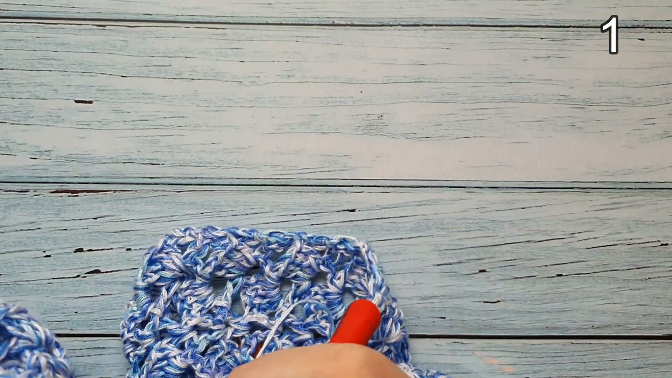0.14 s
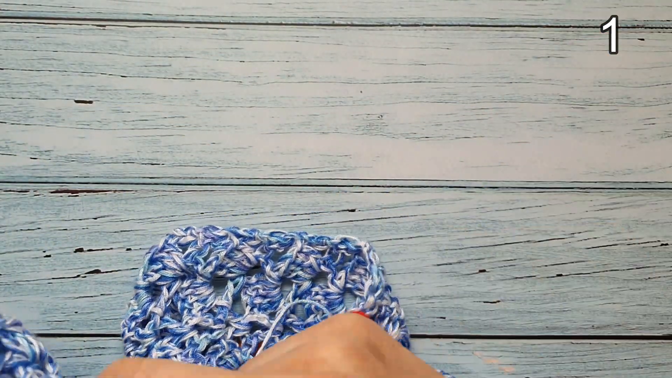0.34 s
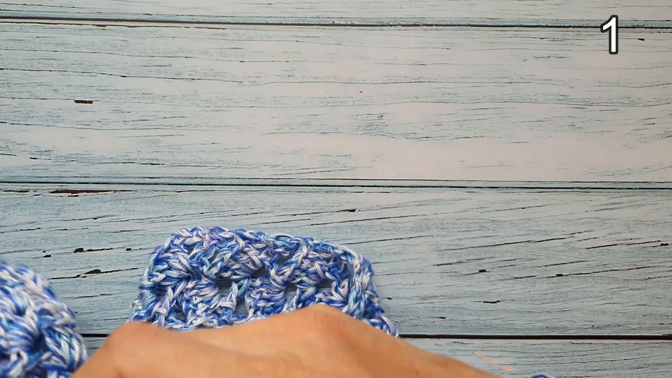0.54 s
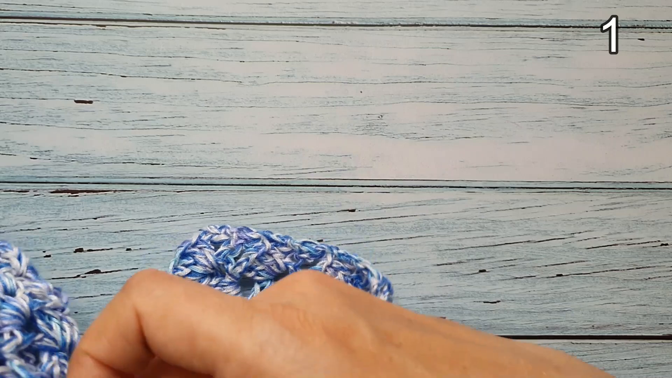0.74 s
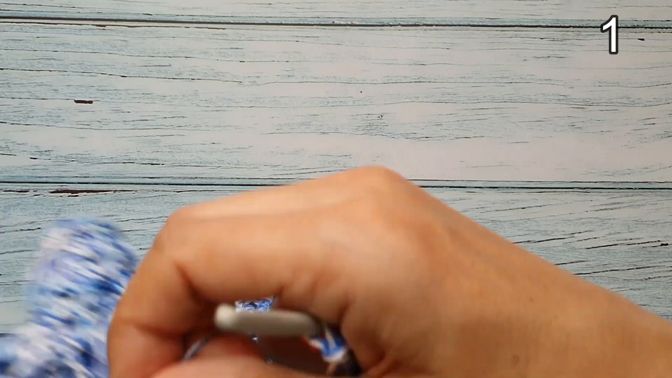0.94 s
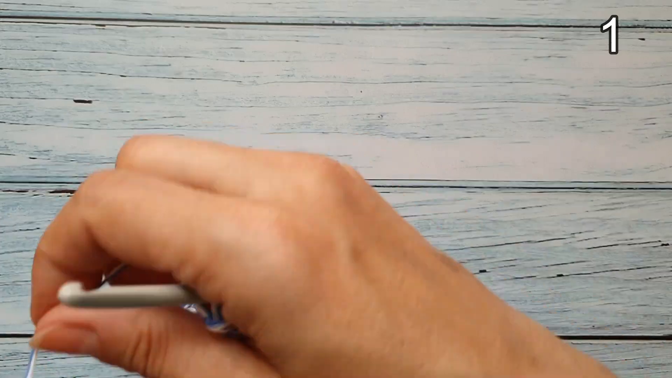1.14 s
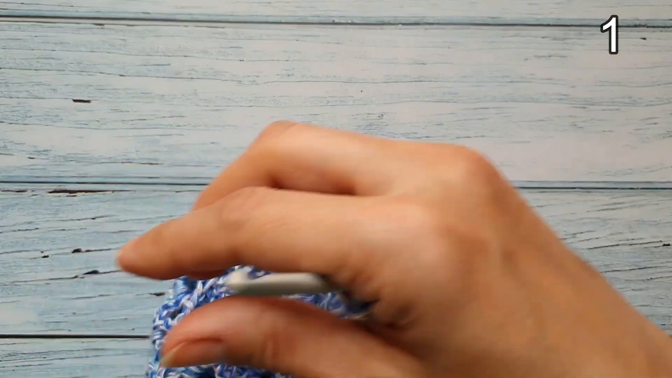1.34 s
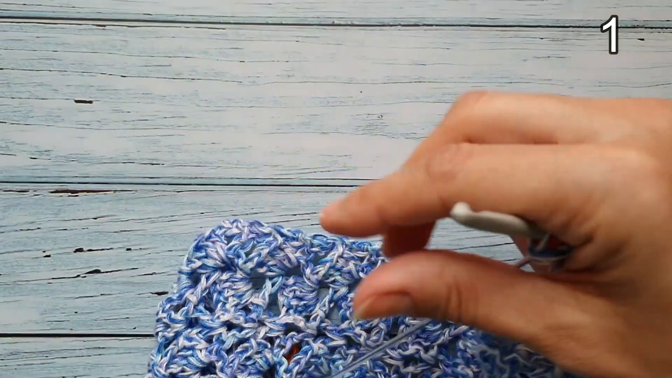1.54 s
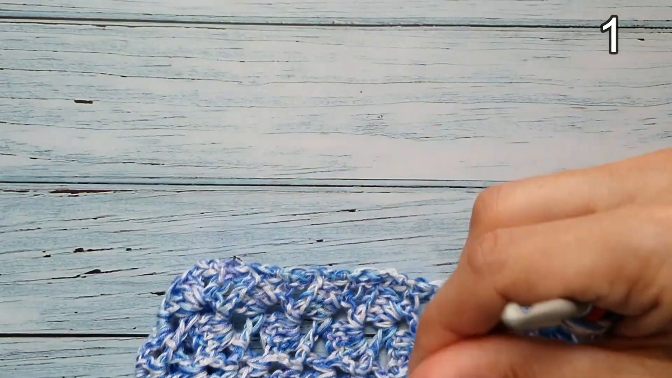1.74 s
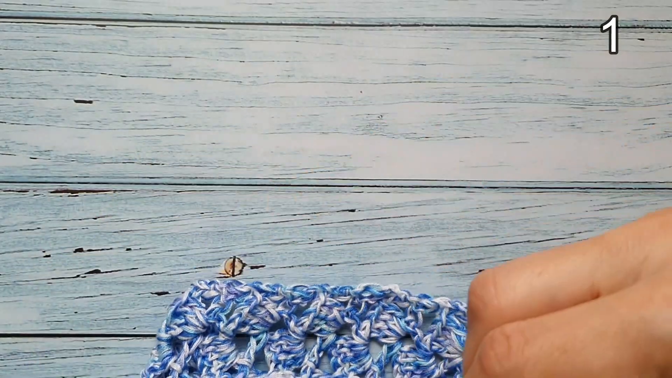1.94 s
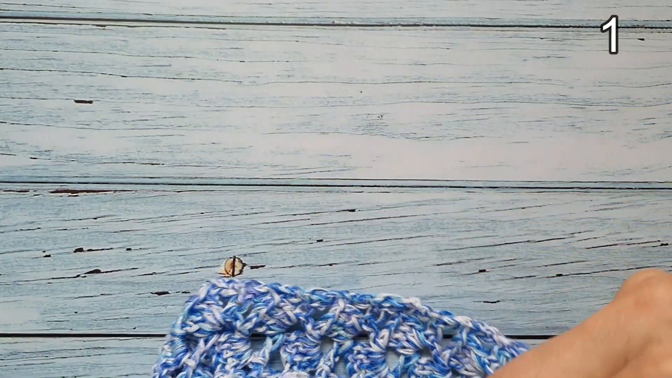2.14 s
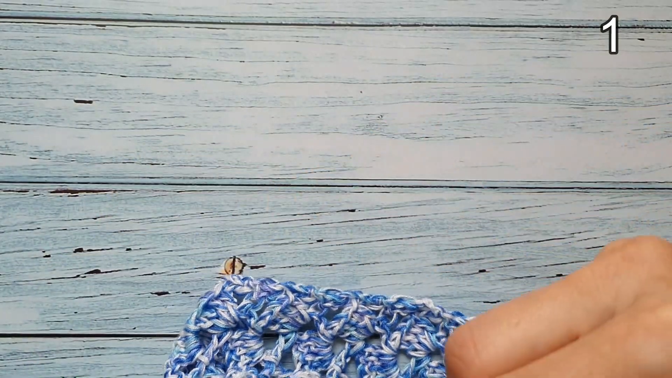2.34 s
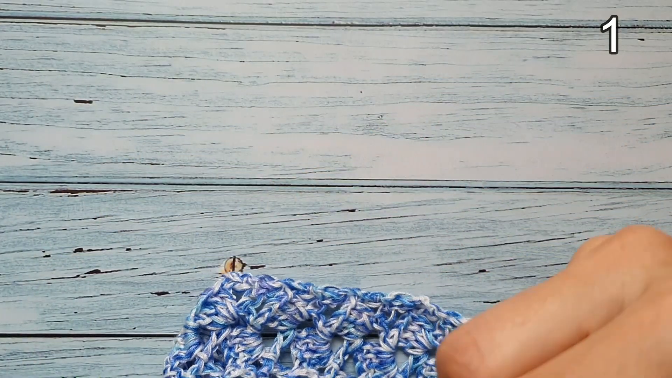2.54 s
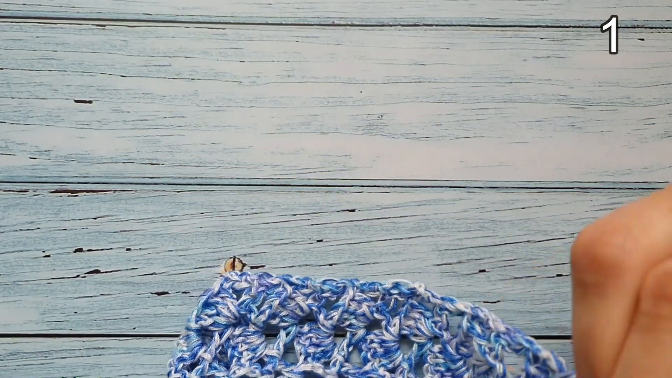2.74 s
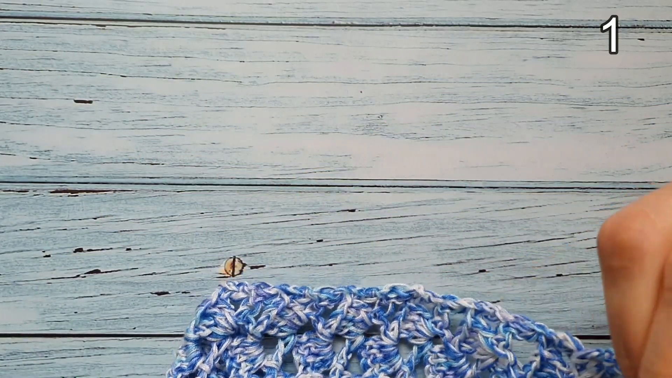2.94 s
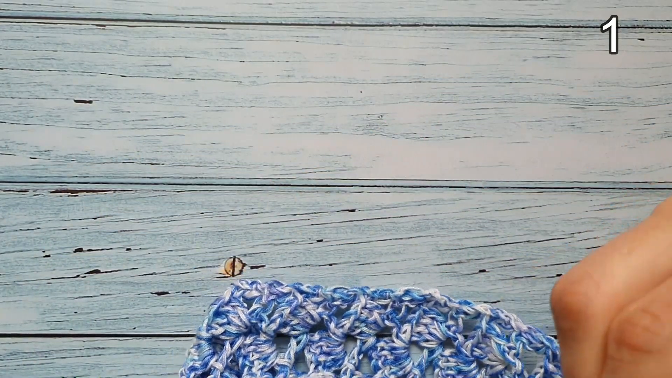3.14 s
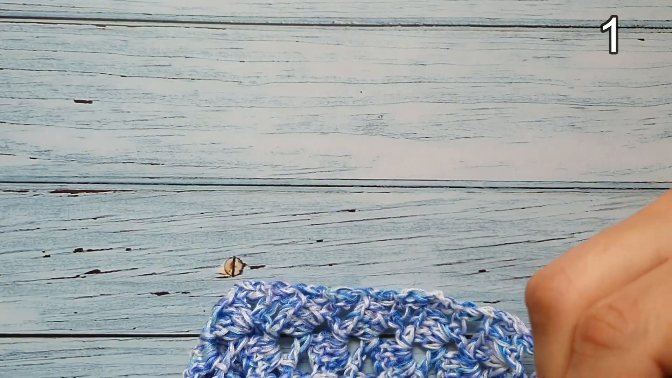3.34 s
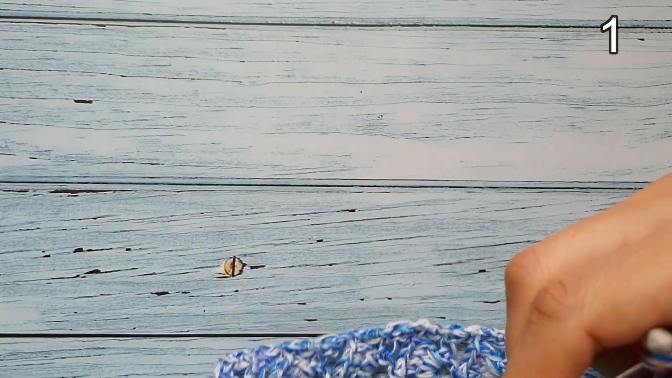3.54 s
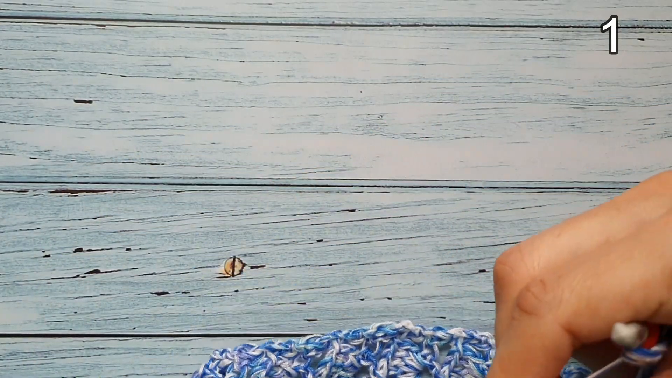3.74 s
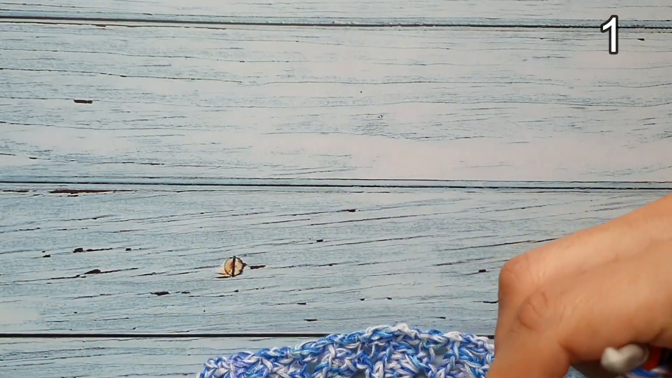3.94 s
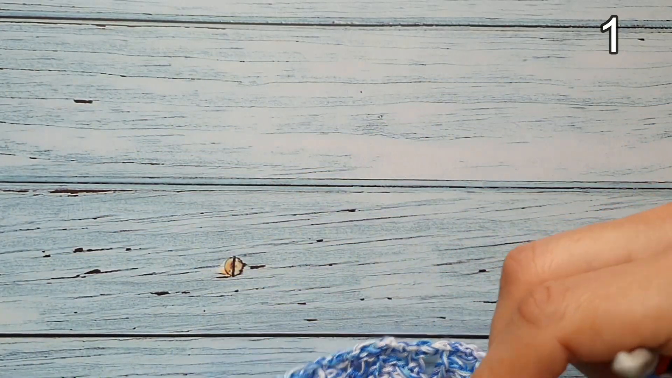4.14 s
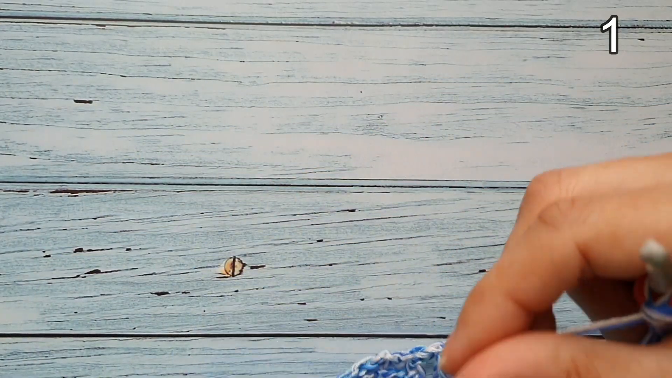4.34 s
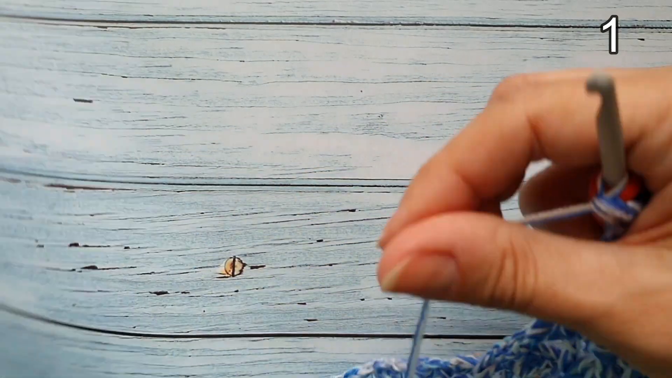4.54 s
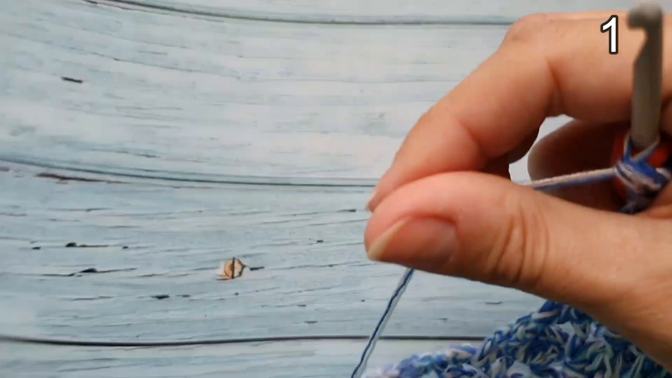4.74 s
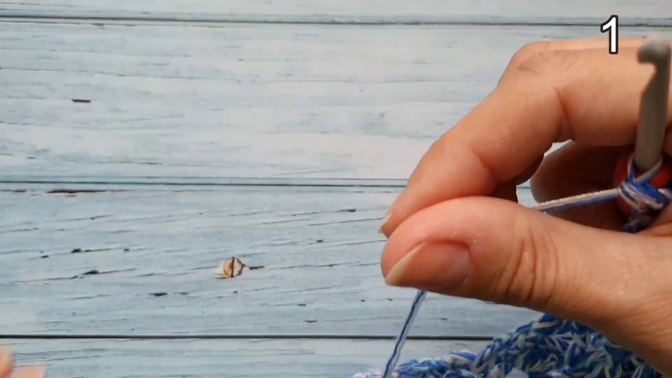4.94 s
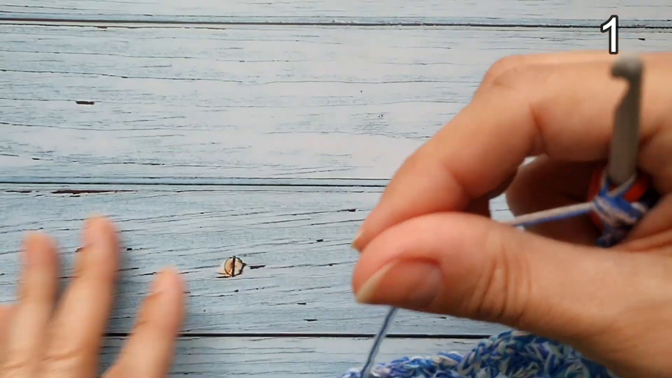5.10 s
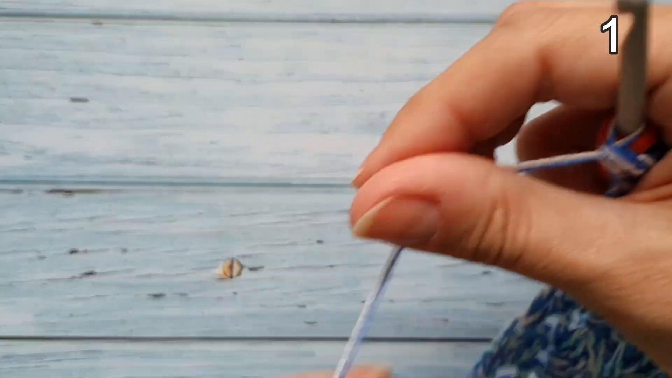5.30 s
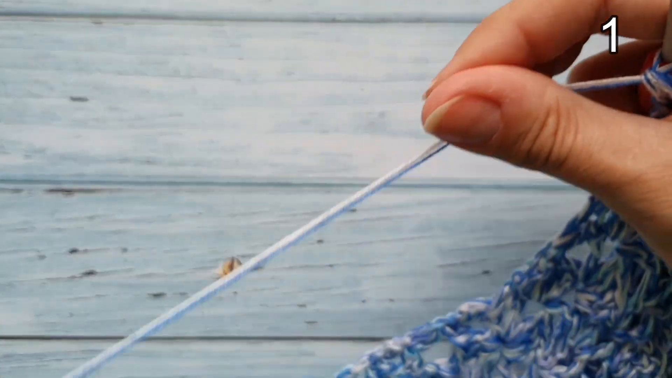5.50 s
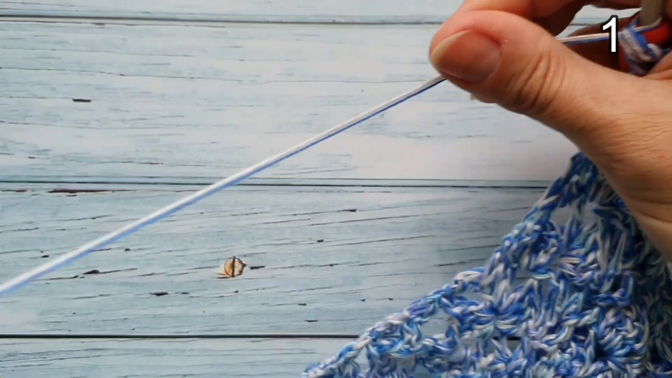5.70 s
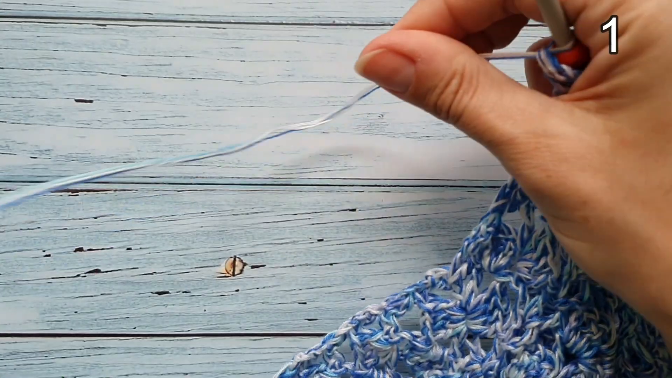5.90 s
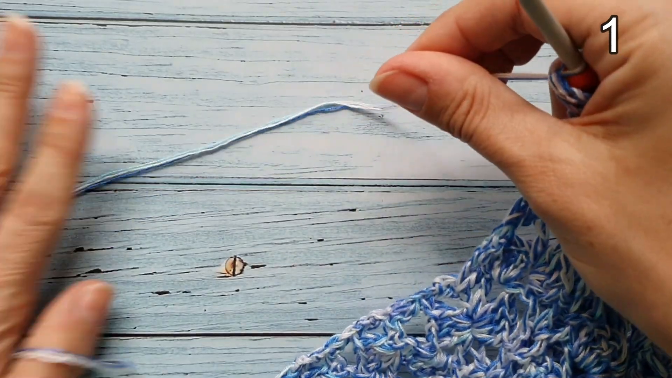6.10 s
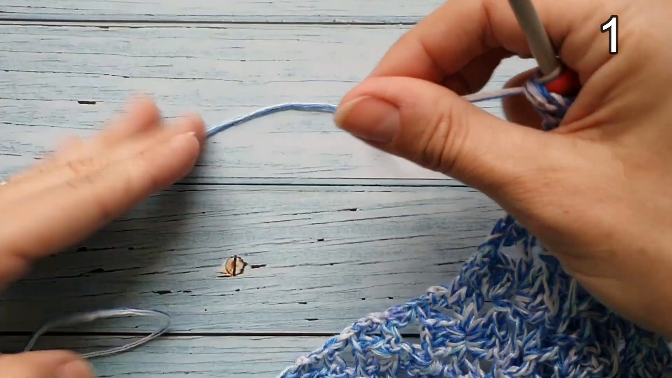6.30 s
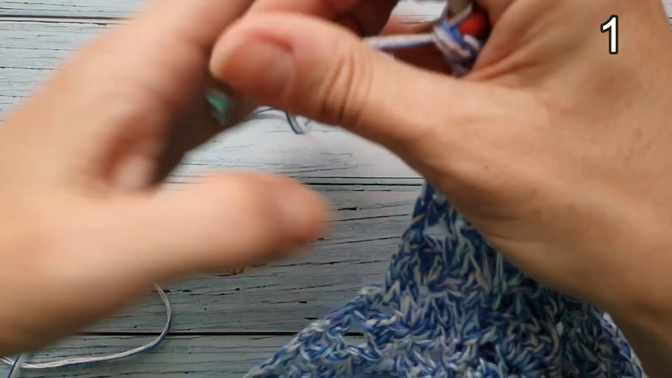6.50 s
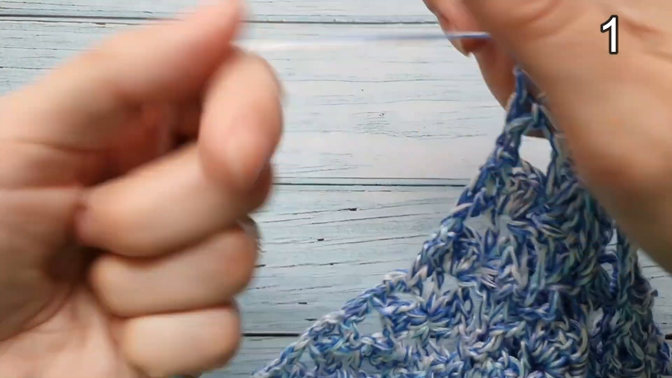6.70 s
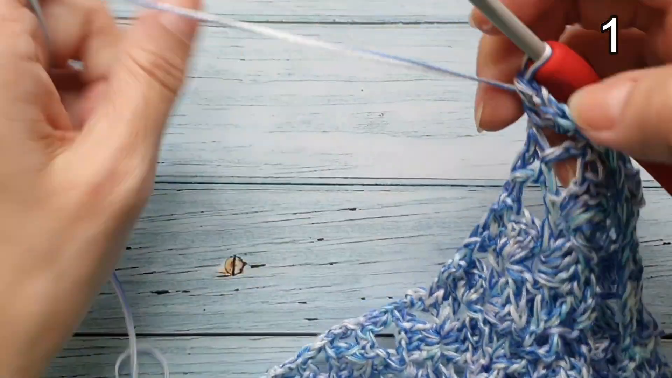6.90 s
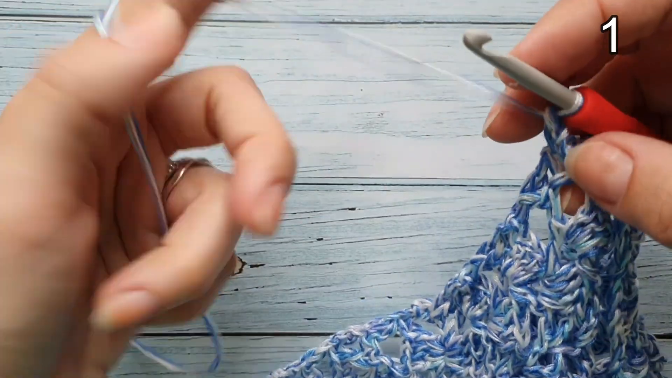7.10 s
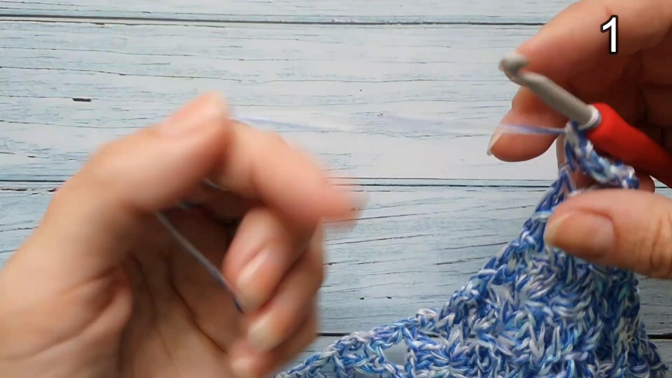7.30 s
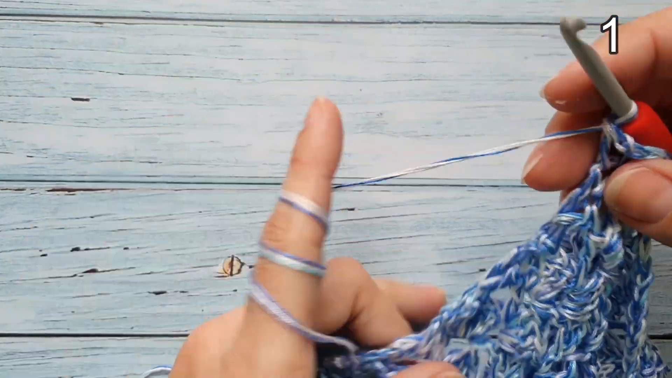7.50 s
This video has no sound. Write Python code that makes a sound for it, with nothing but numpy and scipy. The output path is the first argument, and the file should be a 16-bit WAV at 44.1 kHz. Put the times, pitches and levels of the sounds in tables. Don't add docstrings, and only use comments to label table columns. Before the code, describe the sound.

Close, nearly mono phone pickup of crochet handling on a tabletop. Wool scrapes and fibres hiss in short bursts, palms give dull low thuds, and nails and a hook tick drily. Activity thickens into a hollow wooden clatter, calms to faint rustling, then a single ring-like rap cracks far louder than everything else, with a short rattle and low hum before quiet.

```python
import sys
import numpy as np
from scipy import signal
from scipy.fft import rfft, irfft
from scipy.io import wavfile
from scipy.ndimage import uniform_filter1d

SR = 44100
rng = np.random.default_rng(int(sys.argv[2]) if len(sys.argv) > 2 else 0)


def waveform_to_disk(signal):
    frames = np.transpose(np.atleast_2d(signal))
    scaled = np.clip(frames, -1, 1) * 32767
    samples = np.round(scaled).astype(np.int16)
    wavfile.write(sys.argv[1], SR, samples)


def linear_from_db(decibels):
    return 10 ** (np.asarray(decibels, float) / 20)


N = 337629


def level(x, db):
    return x * linear_from_db(db) / np.sqrt(np.mean(x ** 2))


def band(x, hz, width):
    return signal.lfilter(*signal.iirpeak(min(hz, .4 * SR), hz / width, fs=SR), x)


def walk(rate):
    hold = int(SR / rate)
    steps = np.repeat(rng.standard_normal(N // hold + 1), hold)
    return 2.0 * uniform_filter1d(uniform_filter1d(steps, hold), hold)[:N]


def coloured(points):
    hz, db = np.transpose(points)
    log_hz = np.log(np.fft.rfftfreq(N, 1 / SR) + 1)
    gain = linear_from_db(np.interp(log_hz, np.log(hz), db, left=-60))
    return irfft(rfft(rng.standard_normal(N)) * gain, N)


def add(out, s, x):
    i = int(s * SR)
    out[i:i + len(x)] += x[:N - i]


def fade(t60, seconds):
    return np.exp(-np.log(1000) * np.arange(int(seconds * SR)) / SR / max(t60, .003))


def mode(hz, t60, seconds):
    return np.sin(2 * np.pi * hz * np.arange(int(seconds * SR)) / SR) * fade(t60, seconds)


def slips(scatter_db, size):
    strength_db = scatter_db * np.minimum(rng.exponential(size=size), 7)
    return rng.standard_normal(size) * linear_from_db(strength_db)


# pitch_hz, density_db (per Hz)
ROOM_SPECTRUM = [(15, -36.5), (25, 1), (55, 3.5), (99, 2), (293, -11), (384, -16.5), (775, -20.5),
                 (988, -32.5), (1290, -28.5), (1740, -25.5), (1940, -27.5), (3430, -42.5), (6380, -27.5),
                 (14400, -29), (16000, -41)]
ROOM_DB = -66


def room_air():
    hollow = level(band(rng.standard_normal(N), 820, 130), -84)
    return (level(coloured(ROOM_SPECTRUM), ROOM_DB) + hollow) * linear_from_db(0.79 * walk(9))


# start_s, length_s, level_db
SWAYS = [
    (6.68, 0.12, -65.5),
    (6.764, 0.204, -47.5),
    (6.957, 0.219, -47),
    (7.148, .15, -52.5),
    (7.3, 0.104, -54),
    (7.407, 0.22, -59),
]


def sway():
    size = np.zeros(N)
    for s, seconds, db in SWAYS:
        add(size, s, linear_from_db(db) * np.hanning(int(seconds * SR)) ** 0.73)
    return np.sqrt(2) * size * np.sin(2 * np.pi * 66 * np.arange(N) / SR)


def thump_train(rows, t60):
    out = np.zeros(N)
    for s, db, hz in rows:
        swell = (1 - fade(3.9 / hz, .6)) ** 2
        ring = mode(hz, t60, .6) + linear_from_db(-11.5) * mode(2.3 * hz, 0.73 * t60, .6)
        add(out, s, linear_from_db(db + 9.5) * swell * ring)
    return out


# start_s, level_db, pitch_hz
THUMPS = [(0.927, -47.5, 67.1), (1.254, -58, 68.7), (1.389, -28.5, 73.8), (1.439, -29, 73.9),
          (1.62, -35, 57.6), (1.826, -72, 87.5), (2.338, -53, 79), (2.455, -53, 67.5), (2.957, -50.5, 66),
          (3.191, -41.5, 100), (3.479, -54, 56), (3.994, -35, 74.5), (4.089, -52.5, 60.6),
          (4.165, -50.5, 62.5), (4.417, -40, 76.5), (4.602, -47, 106.3), (4.984, -43.5, 114.4),
          (5.028, -31.5, 70), (5.089, -40.5, 62.2), (5.282, -24.5, 98.3), (5.428, -42.5, 76.2),
          (6.059, -50, 56.5), (6.571, -37.5, 57.9), (6.649, -49.5, 59.6), (7.63, -48.5, 106.3)]
# start_s, level_db, pitch_hz
PRESSES = [
    (2.138, -42, 74.4),
    (3.798, -39, 83.5),
    (4.373, -35.5, 98.3),
    (4.449, -34.5, 66),
    (4.806, -32.5, 75),
    (5.479, -34.5, 57.7),
    (6.183, -41, 76),
    (6.385, -23.5, 80),
    (6.448, -28, 115),
]


def palms():
    return thump_train(THUMPS, t60=0.11) + thump_train(PRESSES, t60=0.1)


# start_s, level_db, tilt_db (per octave)
BUMPS = [
    (5.0295, -27, 5),
    (5.0325, -21, 1),
    (5.0405, -27, -2),
    (5.0478, -23, 0),
    (5.0545, -27, 3),
    (5.0625, -35, 0),
    (5.0705, -32, -1),
    (5.077, -35, -2),
]
# pitch_hz, level_db, t60_s
HOLLOW_MODES = [(436, 2, .08), (560, -2, .05), (684, 1, .07), (829, -2, .05), (1210, -7, .03),
                (1320, -8, .03), (1660, -10, .03), (1950, -15, .02)]


def bumps():
    out = np.zeros(N)
    chance = rng.standard_normal((len(BUMPS), len(HOLLOW_MODES)))
    for (s, db, tilt_db), sides in zip(BUMPS, chance):
        ring = 0
        for side, (hz, mode_db, t60) in zip(sides, HOLLOW_MODES):
            gain = linear_from_db(mode_db + tilt_db * np.log2(hz / 600))
            ring = ring + np.sign(side) * gain * mode(hz, t60, .15)
        ring = ring * (1 - fade(.002, .15))
        add(out, s, linear_from_db(db) * ring / abs(ring).max())
    return out


RAP_S, RAP_DB = 6.3968, -3.3
# pitch_hz, level_db, t60_s
QUICK_MODES = [(233.3, 1, 0.35), (580, 2.5, 0.2), (947, -9, 0.19), (1287, -10, 0.23), (1660, 10, 0.061),
               (1711, -9, 0.15), (2080.5, -3, 0.3), (2350, -13, 0.2), (2632, -12, 0.27), (2844, -9.5, 0.3),
               (2966, -10.5, 0.3), (3450, -1.5, 0.1), (4059, -16, 0.2), (5770, -9, 0.12)]
# pitch_hz, level_db, t60_s
LASTING_MODES = [(219, -37, .7), (598, -39, 1.2), (2540, -51, 1.2), (2640, -51, 1.1), (2940, -45, 0.55),
                 (49.1, -27.5, 0.69)]
# pitch_hz, level_db, t60_s
RATTLE_BANDS = [(444, -18, 0.2), (800, -18, 0.17), (1800, -17, .2), (2900, -15, 0.029), (2700, -26, .2),
                (6000, -33.5, 0.23)]


def rap():
    out = np.zeros(N)
    length_s = 1.2
    quick = 0
    for k, (hz, db, t60) in enumerate(QUICK_MODES):
        quick = quick + (-1) ** k * linear_from_db(db - 15.0) * mode(hz, min(0.44 * t60, .16), length_s)
    snap = linear_from_db(-2) * mode(1500, .009, length_s) + linear_from_db(-3) * mode(2300, .014, length_s)
    snap = snap + linear_from_db(-7) * mode(3200, .022, length_s) + linear_from_db(-16) * mode(6500, .015, length_s)

    noise = rng.standard_normal((len(RATTLE_BANDS) + len(LASTING_MODES), int(length_s * SR)))
    lasting = 0
    for n, (hz, db, t60) in zip(noise[::-1], LASTING_MODES):
        shaken = level(band(n, hz, 8 + .03 * hz), -3) * fade(t60, length_s)
        lasting = lasting + linear_from_db(db) * (mode(hz, t60, length_s) + shaken)
    rattle = 0
    for n, (hz, db, t60) in zip(noise, RATTLE_BANDS):
        rattle = rattle + level(band(band(n, hz, 0.89 * hz), hz, 0.89 * hz), db) * fade(t60, length_s)
    add(out, RAP_S, linear_from_db(RAP_DB) * (quick - snap + lasting + rattle))
    return out


# start_s, level_db, low_hz, high_hz
SPARKS = [(1.388, -46, 5460, 7200), (1.6222, -45, 500, 2400), (1.3875, -42, 600, 2300),
          (5.0785, -44, 6300, 9300), (5.0895, -50, 6000, 9000), (1.623, -55.5, 5000, 6800),
          (1.688, -50, 5300, 7000), (1.569, -54, 6000, 6900), (1.6885, -52, 500, 1200),
          (6.229, -48, 2550, 2950), (6.234, -56, 1650, 1940), (5.5065, -43, 600, 1300),
          (2.134, -52, 1500, 3500), (2.1735, -43, 600, 2400), (4.389, -48, 5000, 7500),
          (4.617, -47, 2500, 4500), (4.6555, -41, 6000, 15000), (4.673, -54, 4000, 11000),
          (4.807, -51.5, 6000, 12500), (4.8204, -37, 2500, 11000), (4.861, -40.5, 2000, 4200),
          (4.9345, -42, 5000, 11000), (5.0475, -40, 2800, 14000), (5.098, -23.5, 1500, 4630),
          (5.1183, -25, 1580, 4560), (5.2825, -36, 4000, 14000), (5.3031, -39, 5500, 10000),
          (6.413, -18, 4800, 8200), (6.414, -24, 2700, 3670), (6.424, -29, 5000, 7000)]


def sparks():
    out = np.zeros(N)
    for (s, db, low_hz, high_hz), a in zip(SPARKS, rng.standard_normal((len(SPARKS), 600))):
        burst = a * fade(.012, 1)[:len(a)]
        bandpass = signal.butter(2, [low_hz, high_hz], "band", fs=SR, output="sos")
        snap = signal.sosfilt(bandpass, burst)
        add(out, s, linear_from_db(db) * snap / abs(snap).max())
    return out


def tick_train(rows, tail_db):
    out = np.zeros(N)
    chance = rng.standard_normal((len(rows), 2, SR // 5))
    for (s, db, hz, tip_db, wood_db), (a, b) in zip(rows, chance):
        burst = mode(hz, 2.5 / hz, .2) + linear_from_db(tail_db - 5.0) * a * fade(0.11, .2)
        middle = band(band(burst, hz, 1.1 * hz), hz, 1.1 * hz)
        tip = band(band(.5 * burst + a * fade(.006, .2), 6500, 2600), 6500, 3200)
        wood_noise = band(band(b * fade(0.02, .2), 420, 830), 610, 1000)
        wood = mode(710, 0.031, .2) + linear_from_db(13.5) * wood_noise
        parts = [(middle, 0), (tip, tip_db + 8.0), (wood, wood_db + 1.5)]
        add(out, s, sum(linear_from_db(db + part_db) * part / abs(part).max() for part, part_db in parts))
    return out


# start_s, level_db, pitch_hz, tip_db, wood_db (the last two re level_db)
KNOCKS = [(1.3871, -38.5, 1740, -6, 1), (1.6217, -43.5, 1440, -18, 1.5), (1.6885, -52, 1000, -20, 5),
          (3.5482, -75.5, 1750, 1, 16), (3.656, -61.5, 1350, -8, 4.5), (3.7004, -49.5, 1800, -4.5, 1.5),
          (3.7045, -57, 1780, -12.5, 10.5), (3.7873, -55, 1540, 1.5, 5), (4.0844, -52, 1120, -14, -3.5),
          (4.375, -44, 1720, -12, -1), (4.3804, -44.5, 1820, -10, 3.5), (4.6284, -47.5, 1440, -14.5, 5),
          (5.0774, -44, 1430, -20, -11), (5.4886, -62.5, 1760, -8, 9), (5.5065, -48.5, 1940, -2.5, 9),
          (6.4105, -14.5, 2190, -32.5, -3.5)]
CLICKS = [(1.5687, -48, 1630, -31, -21.5), (2.1456, -42.5, 1330, -18, -1), (2.173, -46, 1830, -11, -8.5),
          (2.9494, -62, 1740, -7, 5), (3.1957, -32, 4350, -54.5, -11), (3.729, -56, 8500, -6, -20),
          (3.738, -49.5, 1300, -12.5, -13), (3.923, -63.5, 8500, 3, -14), (4.262, -65, 5500, 0, -5),
          (4.0043, -54, 1070, 8.5, 17.5), (5.0968, -25.5, 3750, -37.5, -29.5),
          (5.2706, -22.5, 2700, -14, -13.5), (5.2807, -27, 2900, -6.5, -13.5),
          (5.2854, -22.5, 4520, -16.5, -15), (6.2298, -58, 2750, -4, -11.5), (7.638, -54.5, 1920, -4.5, 3)]
SNAGS = [(0.0315, -51, 1740, -2, -13), (0.9272, -58.5, 1700, 0.5, -2.5), (2.1405, -42.5, 2650, -21, -4),
         (2.2089, -51.5, 2320, -15, -19), (4.4707, -63, 4960, 16.5, -8.5), (4.5405, -49, 3350, -4.5, -24),
         (4.6571, -35, 3500, -14.5, -35), (4.7062, -44, 3170, -8, -18), (4.805, -31, 1490, -20, -8),
         (4.8195, -26.5, 1515, -13.5, -5.5), (4.8602, -35.5, 1820, -20, -2.5), (4.997, -30, 2500, -38, -18),
         (5.0478, -32, 1480, 3.5, -7), (5.0478, -31.5, 7640, -29, -30), (5.1182, -26.5, 2250, -30, -15),
         (5.3014, -23.5, 2480, -19.5, -14), (5.4655, -55, 2150, -8, -8)]


def ticks():
    return tick_train(KNOCKS, -16.5) + tick_train(CLICKS, -7.5) + tick_train(SNAGS, 0)


# start_s, length_s, level_db, centre_hz, width_hz
BRUSHES = [(1.404, 0.14, -60, 3700, 5200), (1.405, 0.049, -64, 9400, 2800),
           (1.423, 0.164, -59.5, 1474, 990), (1.62, 0.36, -66, 5300, 1800),
           (3.194, 0.0933, -58, 4400, 3960), (3.208, 0.0209, -44.5, 222, 150),
           (3.737, 0.2, -58.5, 4464, 2980), (4.724, 0.034, -48, 2600, 4100),
           (4.831, 0.055, -54, 7630, 6000), (4.884, 0.0247, -41, 201, 150), (4.913, 0.049, -51, 6930, 9000),
           (5.018, 0.044, -35.5, 934, 1800), (5.051, 0.038, -39, 841, 1500), (5.048, .05, -45, 7000, 600),
           (5.048, .04, -48, 8600, 600), (5.05, .04, -58, 12000, 6000), (1.4, .19, -66, 5800, 1300),
           (1.62, .3, -66, 4050, 350), (5.274, 0.0254, -37, 2760, 3060), (5.279, 0.039, -39.5, 381, 268),
           (5.394, 0.0575, -64.5, 8480, 5100), (6.439, 0.13, -53.5, 5506, 7000),
           (6.383, 0.00355, -30.5, 3280, 6000), (6.386, 0.015, -31.5, 2990, 6500)]
# start_s, length_s, level_db,
# first_hz, last_hz
HUMS = [
    (1.612, 0.346, -61, 3850, 3954),
    (3.291, 0.0438, -56.5, 395, 402),
    (5.903, 0.59, -73, 800, 826.3),
    (7.049, 0.48, -74.5, 830, 804.5),
]
# start_s, length_s, level_db, first_hz, last_hz, width_hz
SWEEPS = [(1.4, 0.193, -61, 1000, 1500, 330), (1.477, 0.14, -63, 1900, 2800, 500),
          (1.56, 0.41, -64.5, 2900, 3015, 400), (1.618, .16, -61, 3600, 3400, 300),
          (1.625, .2, -67.5, 5900, 6000, 500), (4.277, 0.12, -70.5, 1700, 1827, 300),
          (4.696, 0.063, -50.5, 6200, 4200, 2600), (4.765, 0.0314, -63, 8000, 8000, 9000),
          (4.836, 0.042, -50, 7300, 6700, 1800), (4.915, .055, -45, 6600, 7200, 2600),
          (6.07, .24, -72.5, 3250, 2500, 600), (6.17, .2, -69.5, 2400, 2000, 400),
          (6.42, .17, -62, 10000, 10000, 8000), (5.6, .26, -70, 2450, 2600, 730),
          (2.93, .08, -68, 1800, 2000, 2200), (5.52, .07, -72, 1100, 900, 700),
          (5.36, .12, -66, 600, 620, 120), (7.22, .07, -76, 8500, 8500, 8000),
          (7.32, .07, -76, 8500, 8500, 8000), (7.47, .06, -74, 8500, 8500, 8000),
          (7.54, .06, -75, 8500, 8500, 8000), (5.1, .02, -44, 2400, 2600, 2200),
          (1.75, .22, -69, 2050, 1800, 270), (1.95, .2, -70, 3200, 3100, 500),
          (4.994, .025, -43.5, 3200, 1900, 1300), (6.05, 0.316, -71.5, 1530, 1700, 600),
          (6.823, 0.142, -70.5, 3800, 3850, 800), (6.98, .13, -69, 4303, 5700, 1300)]


def strokes():
    out = np.zeros(N)
    rows = [(s, seconds, db, hz, hz, width, .3) for s, seconds, db, hz, width in BRUSHES]
    rows += [(*row, min(0.19 * row[3], 800), .3) for row in HUMS]
    rows += [(*row, 1) for row in SWEEPS]
    chance = slips(3.0, (len(rows), 2, SR // 2))
    for (s, seconds, db, first_hz, last_hz, width, soft), (a, b) in zip(rows, chance):
        n = min(int(seconds * SR), len(a))
        lowpass = signal.butter(5, width / 2, fs=SR, output="sos")
        spread = signal.sosfilt(lowpass, (a + 1j * b)[-n - SR // 20:])[-n:]
        carrier = np.exp(2j * np.pi * np.cumsum(np.linspace(first_hz, last_hz, n)) / SR)
        add(out, s, level((spread * carrier).real, db) * np.hanning(n) ** soft)
    return out


def gestures(rows, swells, attack_s, release_db_s, rest_db, rest_other_db):
    t = np.arange(N) / SR
    sag_db_s = 4
    main, other = linear_from_db(2 * rest_db), linear_from_db(2 * rest_other_db)
    moves = []
    for s, seconds, db, rel_db in rows:
        rise = np.clip((t - s) / attack_s, 0, 1) ** 2
        loss_db = sag_db_s * np.maximum(t - s, 0) + release_db_s * np.maximum(t - s - seconds, 0)
        moves.append((rise * linear_from_db(-2 * loss_db), db, rel_db))
    for s, seconds, db, rel_db in swells:
        moves.append((np.exp(-((t - s) / seconds) ** 2), db, rel_db))
    for shape, db, rel_db in moves:
        main = main + shape * linear_from_db(2 * db)
        other = other + shape * linear_from_db(2 * (db + rel_db))
    return 10 * np.log10(main), 10 * np.log10(other)


def friction(body, db, scatter_db, rate, flicker_db):
    out, shared = 0, walk(rate)
    for hz, width, share_db in body:
        ring = band(band(slips(scatter_db, N), hz, 1.3 * width), hz, 1.3 * width)
        flicker = flicker_db * (shared + walk(2 * rate))
        out = out + linear_from_db(share_db + flicker) * level(ring, 0)
    return level(out, 0) * linear_from_db(db)


# centre_hz, width_hz, level_db
BOARD = [(53, 9.6, -2), (66.7, 6.9, -5), (101, 64, -2), (150, 60, -10.5)]
WOOL = [(250, 360, 9), (475, 390, -4.5), (774, 190, 2), (1010, 190, -8)]
FIBRE = [(1630, 870, -2.5), (2500, 3300, 5), (3850, 1900, 2.5), (4800, 1700, -2)]
FUZZ = [(6000, 2100, 1), (7520, 4400, -0.5), (9700, 12000, -3.5), (12950, 4000, -21)]
# start_s, length_s, scrape_db, board_db (re scrape)
SLIDES = [(0, 0.17, -66, 2.5), (1.385, 0.034, -51.5, 9), (1.48, 0.7, -57.5, -0.5), (1.63, 0.043, -67, 16.5),
          (2.12, 0.0413, -59.5, 15), (2.2, 0.176, -71, 9), (3.17, 0.12, -58.5, 4.5),
          (3.69, 0.29, -62.5, 8.5), (3.82, 0.1, -64.5, 18.5), (3.97, 0.0075, -45.5, 10),
          (4.36, 0.016, -50, -12.5), (4.4, 0.04, -63, 18), (4.45, 0.33, -60.5, -1), (4.8, 0.13, -52, 1),
          (4.97, 0.132, -43.5, -6), (5.13, 0.081, -67.5, 11.5), (5.27, 0.044, -47.5, 13.5),
          (5.35, 0.219, -65, 5.5), (6.4, 0.2, -67, 17)]
# start_s, length_s, hiss_db, fuzz_db (re hiss)
RUSTLES = [(0, 0.043, -65.5, -0.5), (1.39, 0.19, -53, -36), (1.61, 0.488, -57.5, -14),
           (2.1, 0.13, -70.5, 0), (3.19, 0.0867, -63, -9.5), (3.7, 0.075, -61.5, -3),
           (3.76, 0.126, -58, -22.5), (3.92, 0.1, -58.5, -10.5), (4.36, 0.51, -62.5, -7.5),
           (4.72, 0.25, -54.5, -7.5), (4.91, 0.0228, -42.5, -10), (4.98, 0.058, -75.5, -17),
           (5.12, 0.048, -64.5, -12), (5.27, 0.046, -50, -4), (5.36, 0.18, -76, 1), (6.38, 0.046, -53, -20)]
# peak_s, half_length_s, scrape_db, board_db (re scrape)
SHIFTS = [
    (1.237, 0.22, -68.5, 0),
    (2.563, 0.077, -72, -1.5),
    (2.796, 0.038, -67, 9),
    (3.039, 0.102, -62.5, -1),
    (3.468, 0.69, -68.5, 1.5),
    (4.222, 0.31, -66, -1.5),
    (5.774, 0.17, -71.5, 11.5),
    (6.243, 0.12, -61.5, -1),
    (6.699, 0.1297, -67, 7),
    (7.203, 0.349, -70, 9.5),
]
# peak_s, half_length_s, hiss_db, fuzz_db (re hiss)
STIRS = [
    (1.2, 0.12, -65.5, -4),
    (2.33, 0.084, -75.5, -10),
    (3.03, 0.12, -68, -13.5),
    (4.31, 0.14, -74.5, -9),
    (5.78, .15, -70.5, 4.5),
    (6.279, 0.089, -75, -3.5),
    (6.871, 0.14, -73.5, 2),
    (7.4, 0.53, -83.5, 9),
]


def drag():
    wool_db, board_db = gestures(SLIDES, SHIFTS, attack_s=0.024, release_db_s=252.5,
                                 rest_db=-89, rest_other_db=-81.5)
    fibre_db, fuzz_db = gestures(RUSTLES, STIRS, attack_s=0.032, release_db_s=248,
                                 rest_db=-85.5, rest_other_db=-75)
    rumble = friction(BOARD, board_db, scatter_db=1.1, rate=9, flicker_db=1.2)
    scrape = friction(WOOL, wool_db, scatter_db=3.5, rate=30, flicker_db=1.0)
    hiss = friction(FIBRE, fibre_db, scatter_db=3.5, rate=40, flicker_db=.7)
    fuzz = friction(FUZZ, fuzz_db, scatter_db=2.5, rate=40, flicker_db=.9)
    return rumble + scrape + hiss + fuzz


def scene():
    background = room_air() + sway()
    blows = palms() + bumps() + rap()
    contacts = sparks() + ticks()
    return np.tile(background + blows + contacts + strokes() + drag(), (2, 1))


# pitch_hz, density_db (per Hz)
HISS_SPECTRUM = [(25, -9), (250, -13), (600, -14.5), (1100, -29.5), (4000, -24), (6400, -15), (15000, -16)]


def channel_difference(one):
    return level(coloured(HISS_SPECTRUM), -79.5) + linear_from_db(-37) * band(one, 280, 300)


def low_pass(x):
    return signal.sosfilt(signal.butter(12, 16810, fs=SR, output="sos"), x)


def record(dry):
    difference = channel_difference(dry[0])
    both = np.clip(dry + np.array([difference, -difference]), -.99, .99)
    both = signal.sosfilt(signal.butter(2, 30, "high", fs=SR, output="sos"), both)
    both = signal.sosfilt(signal.ellip(8, .3, 40, 15700, fs=SR, output="sos"), both)
    return low_pass(both)


dry = scene()
out = record(dry)
waveform_to_disk(out)
```